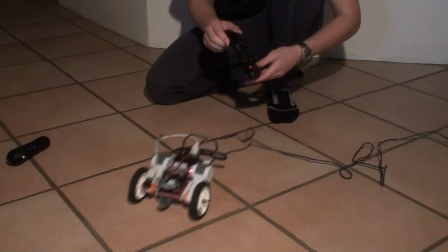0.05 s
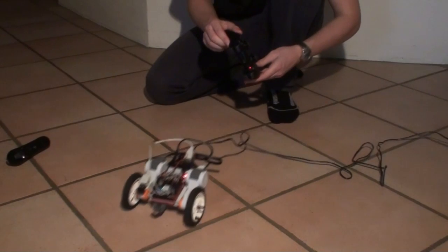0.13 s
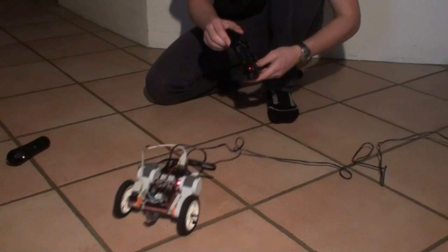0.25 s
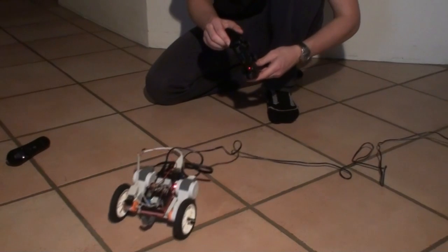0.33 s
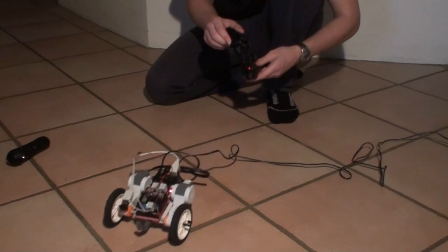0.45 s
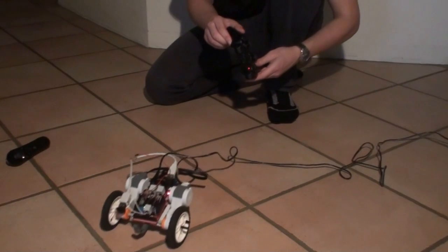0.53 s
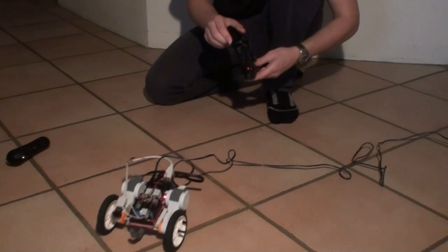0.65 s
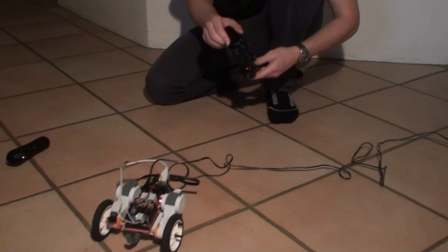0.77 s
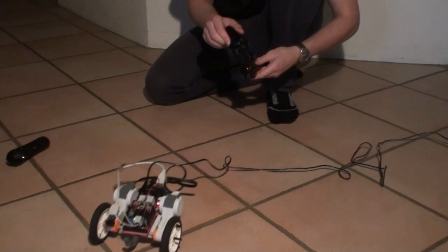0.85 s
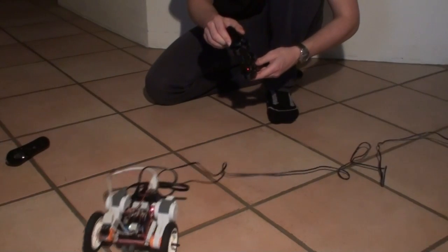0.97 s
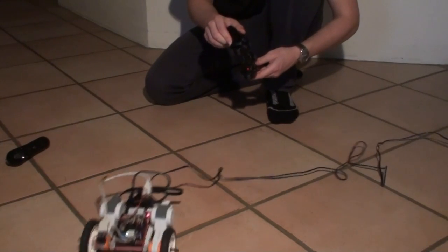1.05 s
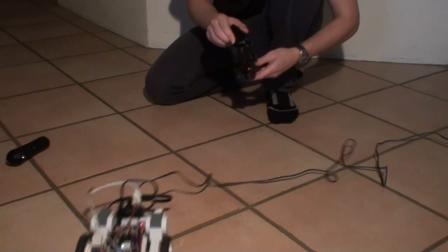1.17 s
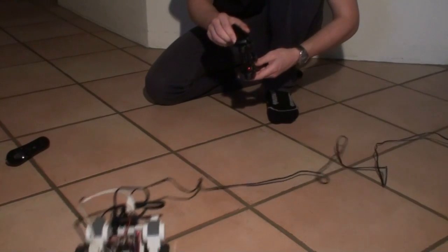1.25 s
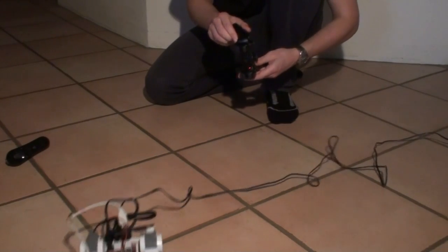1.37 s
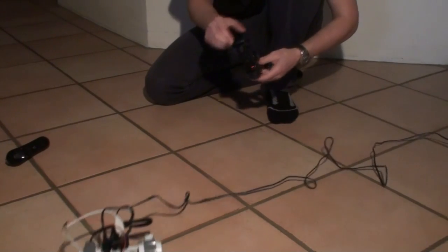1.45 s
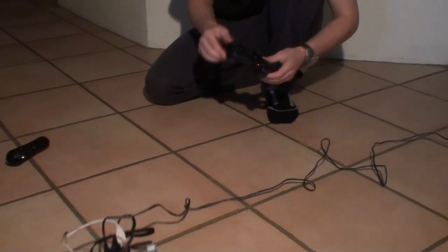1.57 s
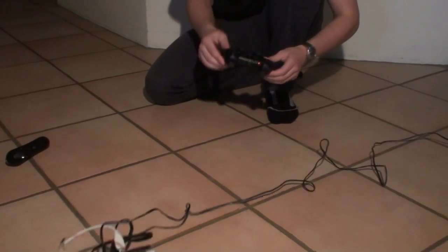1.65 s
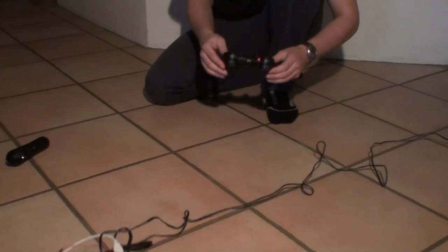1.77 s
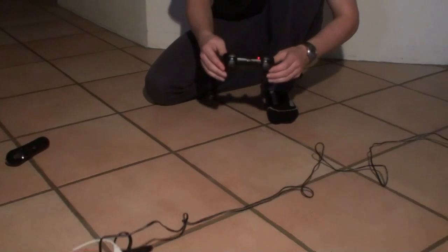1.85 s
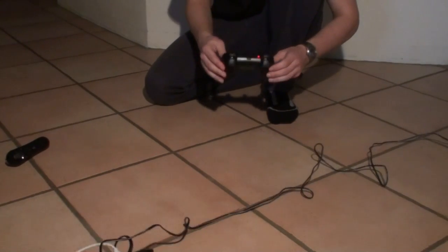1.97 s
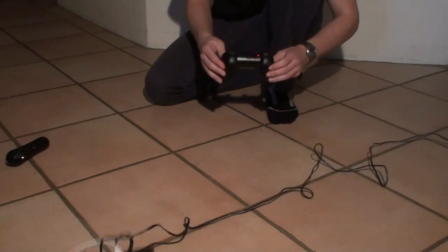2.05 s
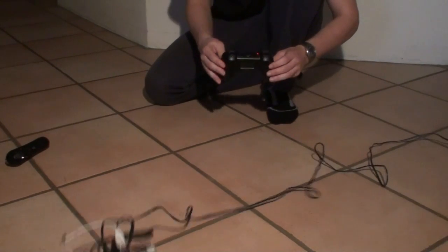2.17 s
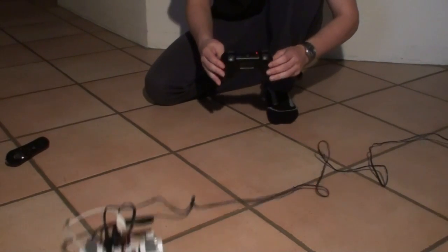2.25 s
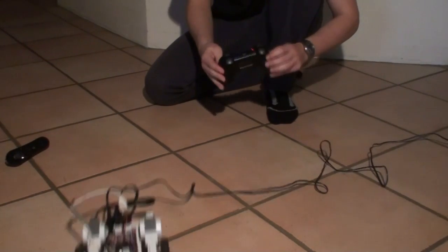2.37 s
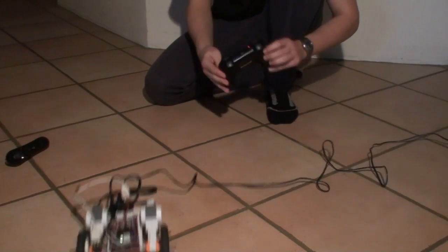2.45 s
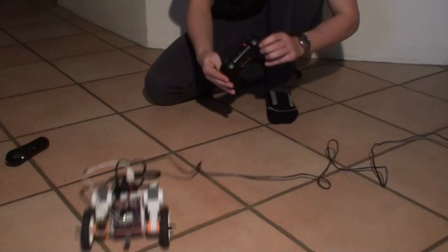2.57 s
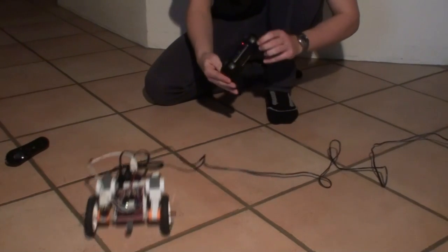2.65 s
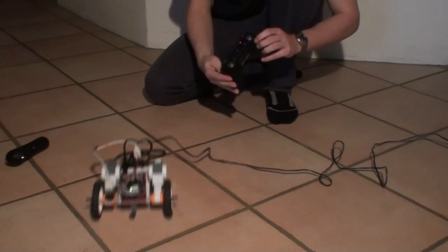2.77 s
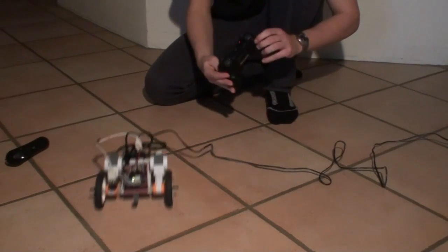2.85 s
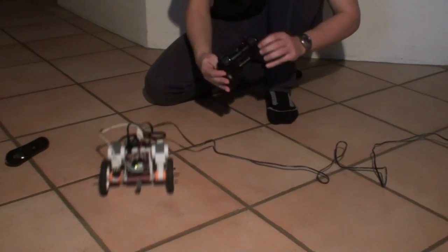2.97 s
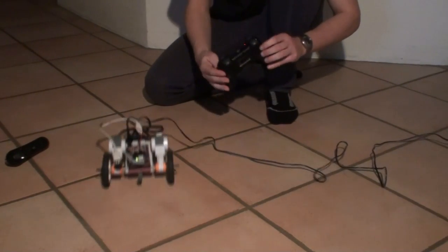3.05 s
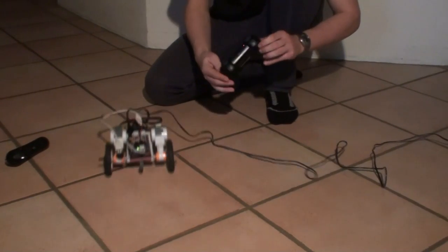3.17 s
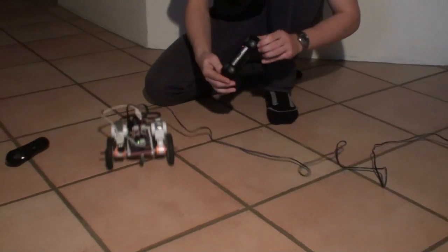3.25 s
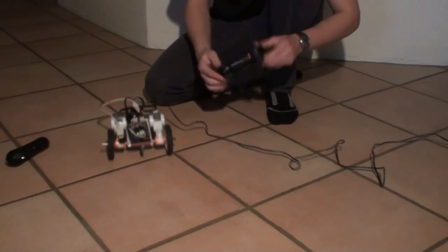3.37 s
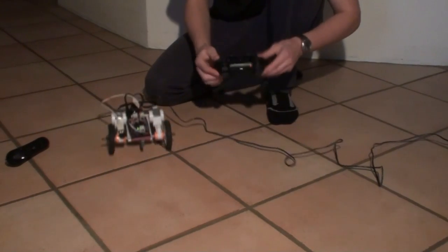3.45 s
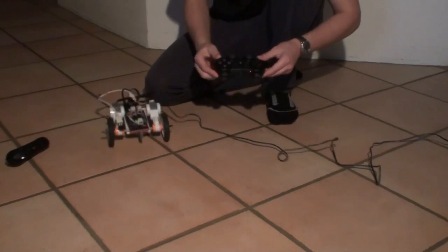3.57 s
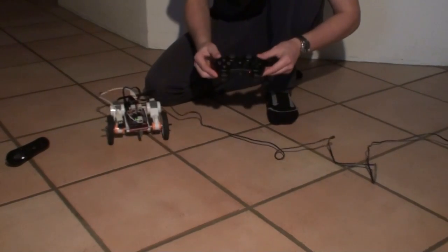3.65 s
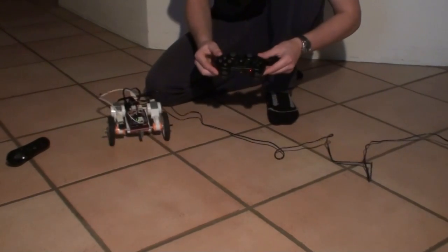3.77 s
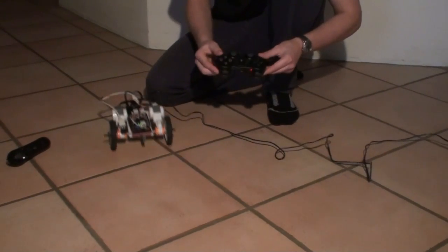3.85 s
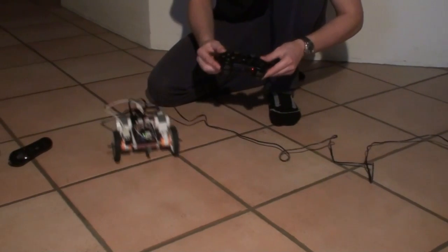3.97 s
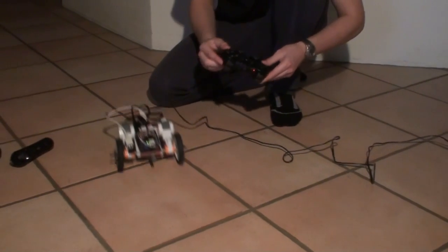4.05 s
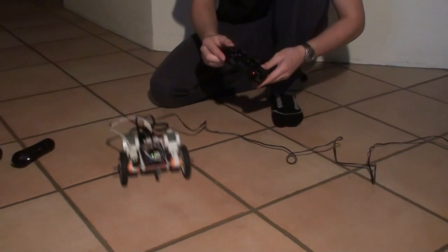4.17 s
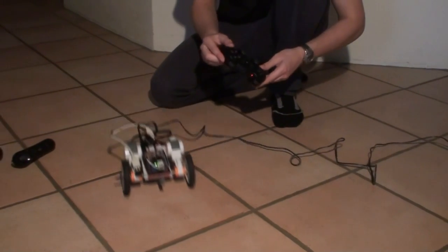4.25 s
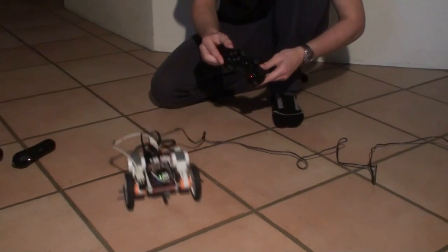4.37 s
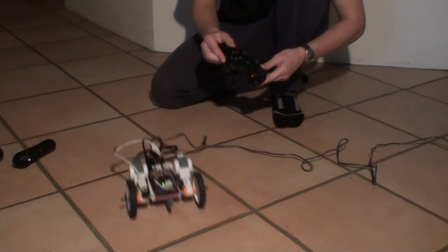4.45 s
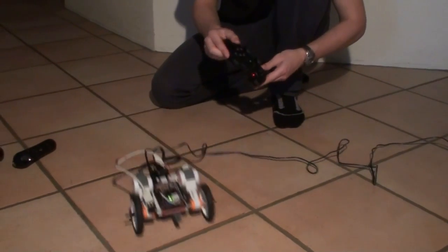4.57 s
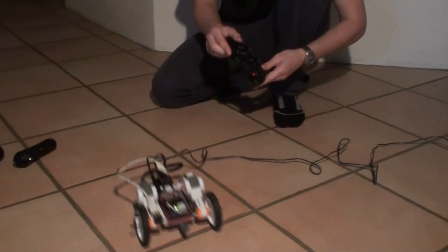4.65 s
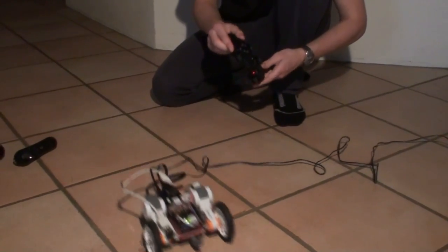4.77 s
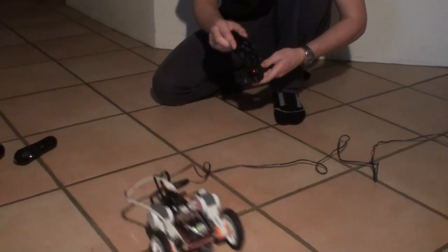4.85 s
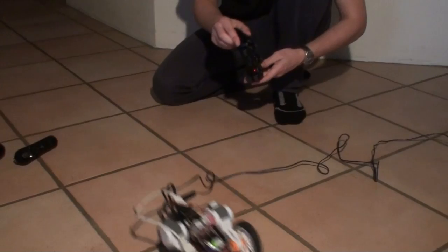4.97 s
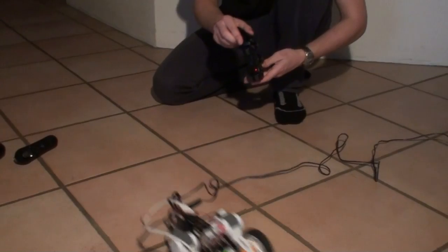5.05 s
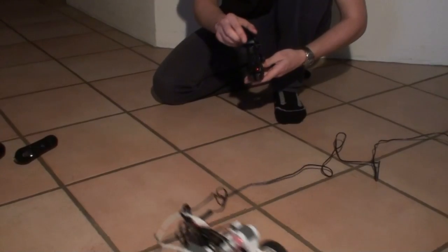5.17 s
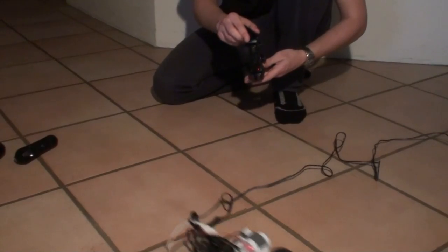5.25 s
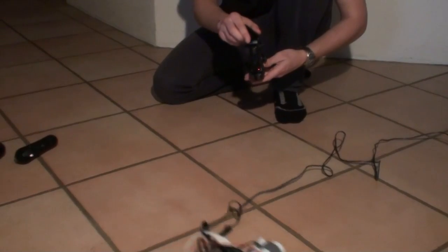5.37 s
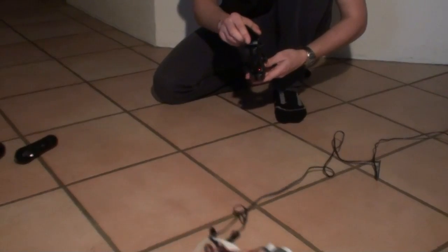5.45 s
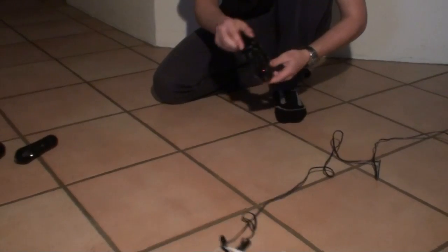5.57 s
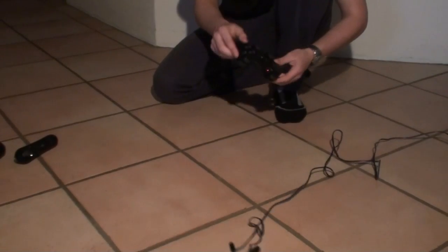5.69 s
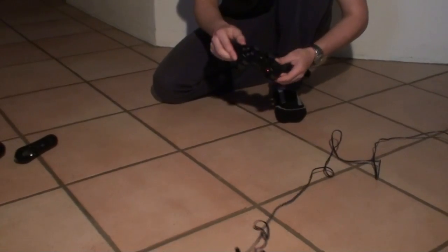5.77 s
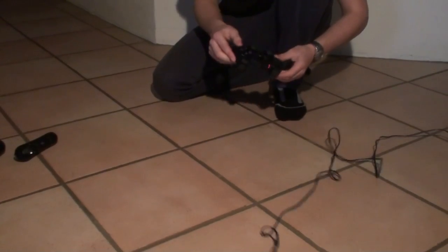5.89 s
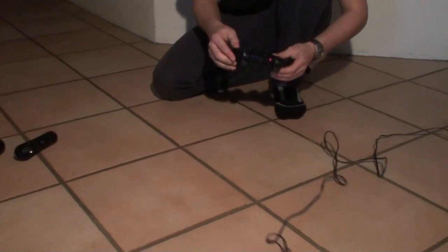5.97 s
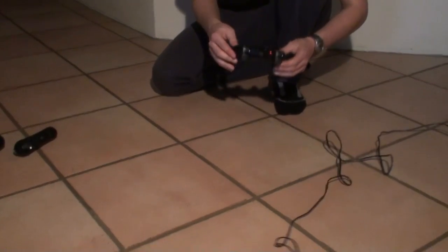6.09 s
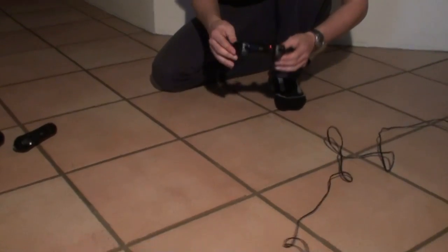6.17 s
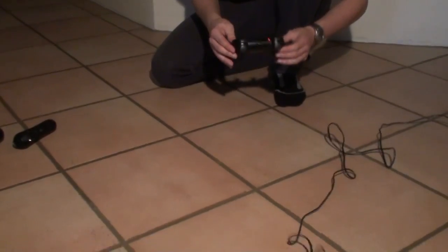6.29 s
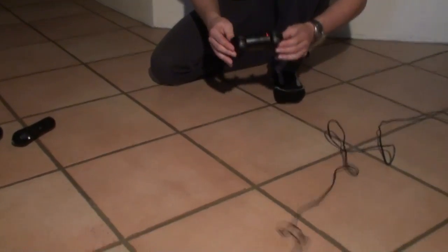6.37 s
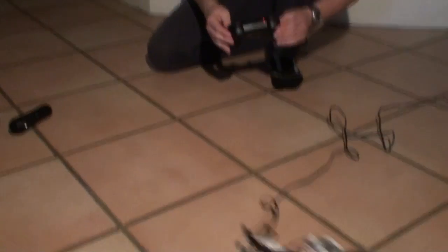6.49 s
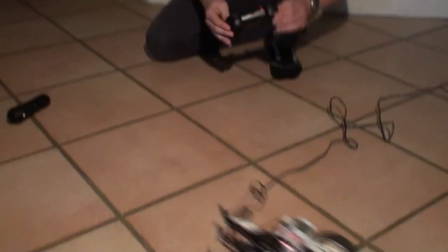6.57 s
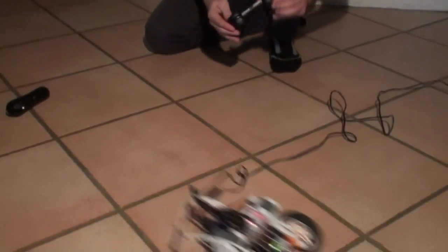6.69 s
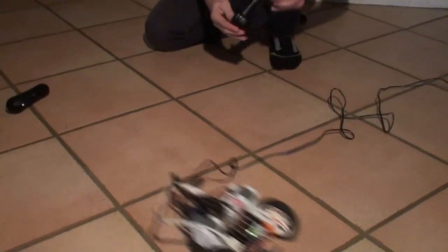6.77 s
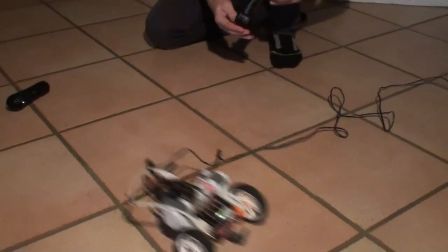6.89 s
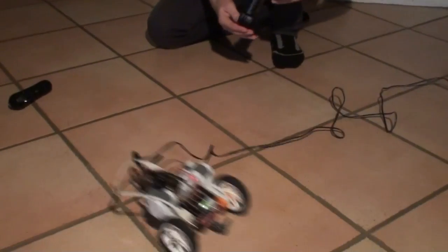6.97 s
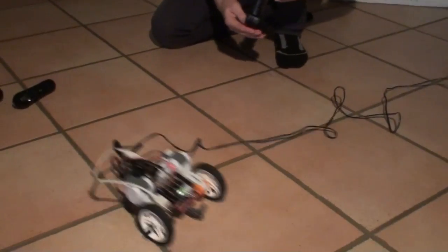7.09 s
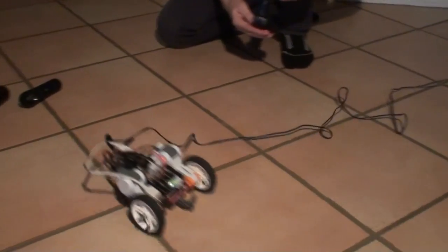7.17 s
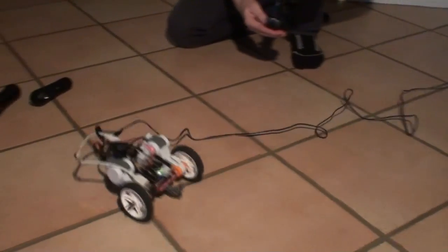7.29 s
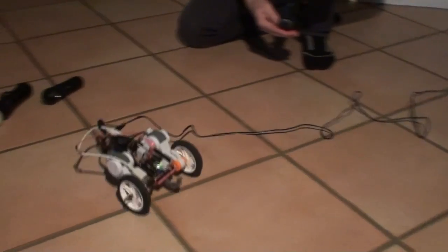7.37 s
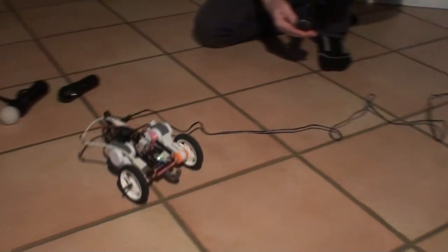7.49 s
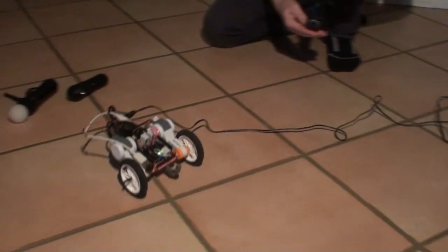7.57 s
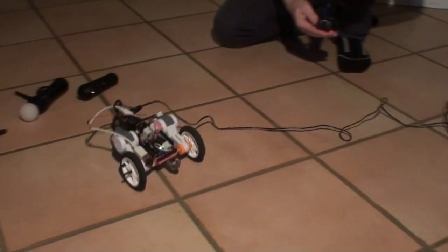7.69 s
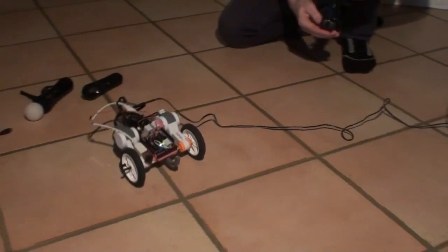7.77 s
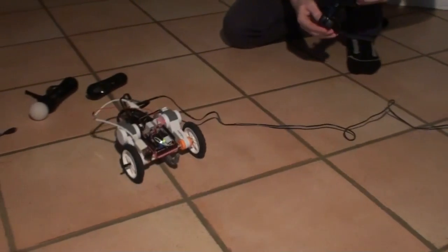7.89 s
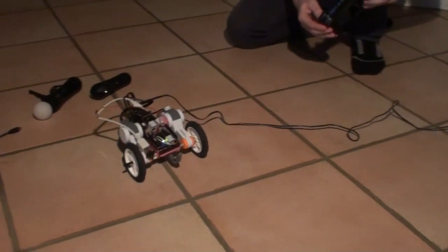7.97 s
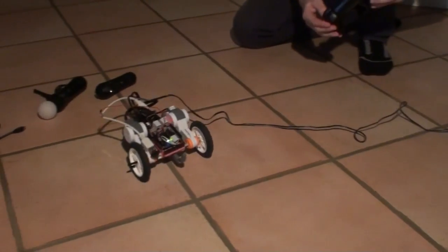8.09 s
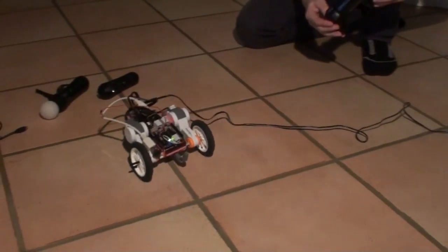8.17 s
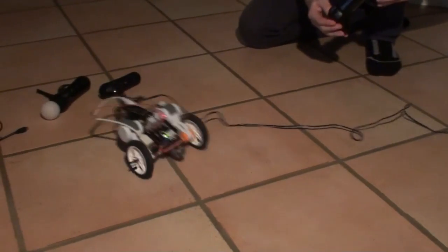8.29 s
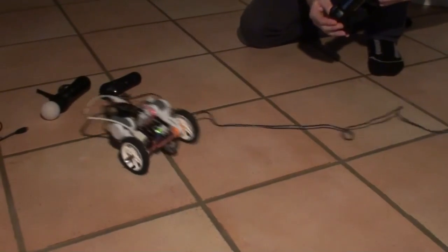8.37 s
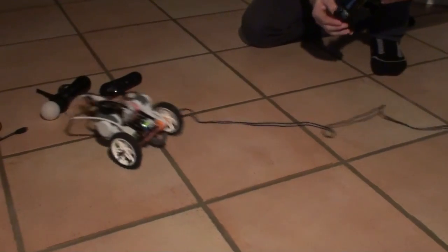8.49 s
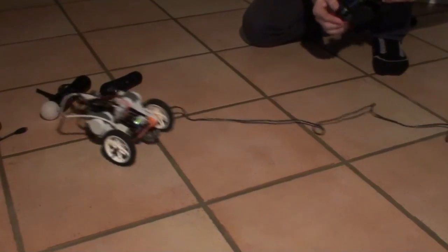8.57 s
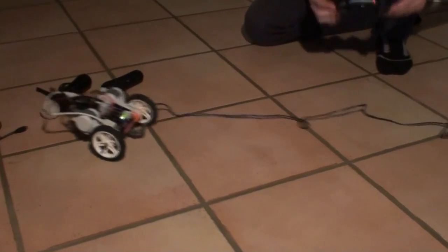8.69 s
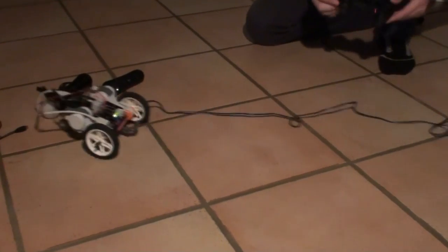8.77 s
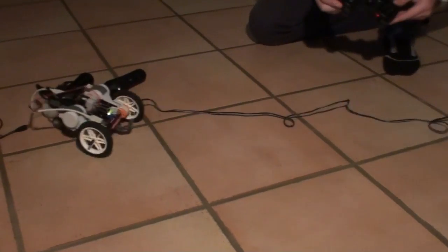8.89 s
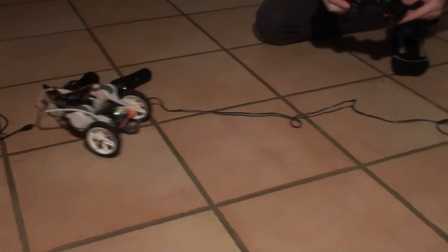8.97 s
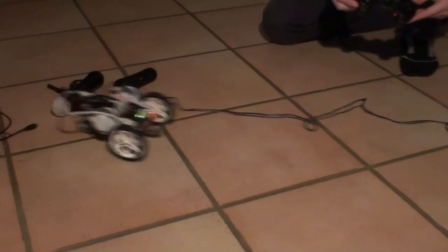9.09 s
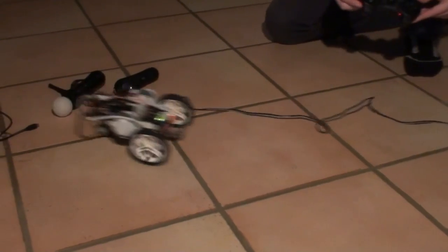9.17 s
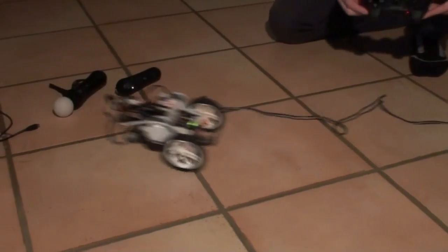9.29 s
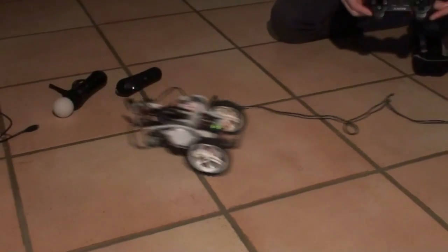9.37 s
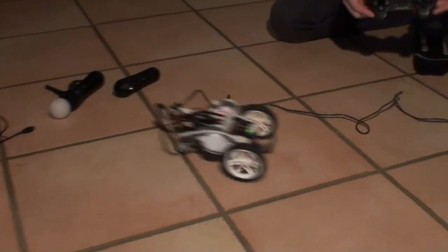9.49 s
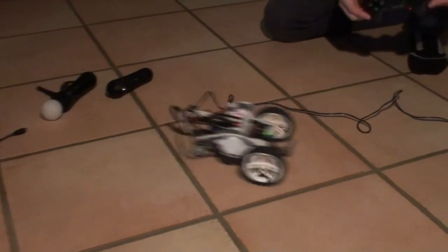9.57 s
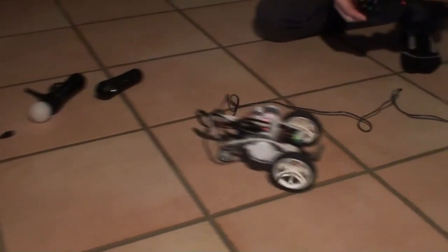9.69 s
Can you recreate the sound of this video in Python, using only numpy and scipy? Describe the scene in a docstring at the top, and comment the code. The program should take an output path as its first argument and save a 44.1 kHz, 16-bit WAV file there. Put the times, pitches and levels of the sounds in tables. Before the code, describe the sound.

A small two-motor toy robot whirs and rattles in bursts over a tiled floor, gear tones gliding up and down in a hard room.

```python
"""Gliding, singing tones over a plastic rattle, with dull knocks, brief squeals, a thin steady whistle and hiss:
a small two-motor robot drives back and forth over a tiled floor on a cable, in a hard room, near a microphone.
Gear teeth mesh in multiples of their contact rate; noise pulsed by the same contacts rings the robot's parts.
The motor driver gives the whistle, damped swings the knocks, decaying noise tails the room's answer."""
import sys
import numpy as np
from scipy import signal
from scipy.fft import rfft, irfft, next_fast_len
from scipy.io import wavfile
from scipy.ndimage import uniform_filter1d, map_coordinates

SR = 44100
rng = np.random.default_rng(int(sys.argv[2]) if len(sys.argv) > 2 else 0)


def inscribe(sig):
    """Save sig as 16-bit PCM at rate SR to the path in sys.argv[1].

    A 1-D sig is mono; a 2-D sig holds one channel per row.
    Samples are clipped to [-1, 1] before scaling.
    """
    pcm = np.round(np.clip(np.atleast_2d(sig).T, -1, 1) * 32767)
    wavfile.write(sys.argv[1], SR, pcm.astype(np.int16))


def linear_from_db(decibels):
    """Turn decibels (scalar or array-like) into linear amplitude factors; 0 gives 1."""
    return 10 ** (np.asarray(decibels, float) / 20)


N = 429534  # length in samples


def unit(x):
    """Normalisation: scales a signal to rms 1."""
    return x / np.sqrt(np.mean(x ** 2) + 1e-20)


def along(points, hz):
    """Interpolation of (Hz, value) points on a logarithmic frequency axis."""
    point_hz, value = np.transpose(points)
    return np.interp(np.log(hz + 1), np.log(point_hz + 1), value)


def curves(rows):
    """Linear interpolation in time: one value per sample for each column after the time."""
    seconds, *columns = np.transpose(rows)
    return [np.interp(np.arange(N) / SR, seconds, column) for column in columns]


def wobble(rate):
    """Band-limited fluctuation: a smooth random curve with rate knots a second."""
    knots = rng.standard_normal(int(N * rate / SR) + 4)
    return map_coordinates(knots, [np.arange(N) * rate / SR])


def filtered(x, response):
    """Linear filtering: the spectrum of x times a response given as a function of frequency."""
    size = next_fast_len(N + SR // 2)
    spectrum = rfft(x, size) * response(np.fft.rfftfreq(size, 1 / SR))
    return irfft(spectrum, size)[..., :N]


def body(modes, steep):
    """Modal superposition: resonances summed with alternating sign; steep sharpens their skirts."""
    def response(f):
        total = 0
        for k, (centre, width, db) in enumerate(modes):
            resonance = 1j * f * width / (centre ** 2 - f ** 2 + 1j * f * width)
            total = total + (-1) ** k * linear_from_db(db) * resonance ** steep
        return total
    return response


# Pushes of the motors, one short curve each. Each row: time in seconds, rattle level in dB before the parts' shares.
PUSHES = [
    [(0.0, -32), (0.32, -34), (0.68, -44)],
    [(0.76, -36.5), (0.86, -40.5)],
    [(0.93, -34.5), (1.03, -31), (1.41, -26), (1.95, -40)],
    [(2.16, -31), (2.28, -25)],
    [(2.36, -27.5), (2.41, -26), (3.63, -28.5)],
    [(3.88, -27), (4.45, -32), (5.05, -27.5), (5.83, -35.5)],
    [(5.875, -30), (5.92, -28.5), (6.05, -24.5), (6.21, -30)],
    [(6.375, -34), (6.43, -22.5), (6.48, -23)],
    [(6.59, -23), (6.64, -23)],
    [(6.75, -24), (7.05, -27), (7.19, -24), (7.92, -37)],
    [(8.29, -39), (8.35, -28.5), (8.71, -27), (8.93, -32)],
    [(9.09, -32.5), (9.14, -28.5), (9.74, -27.5)],
]


def drive_db():
    """Masking by the strongest: the loudest push sets the level, each rising and dying at common rates."""
    t = np.arange(N) / SR
    rise_db_per_s, fall_db_per_s = 260, 148
    levels = []
    for push in PUSHES:
        before = np.clip(push[0][0] - t, 0, None)
        after = np.clip(t - push[-1][0], 0, None)
        levels.append(curves(push)[0] - rise_db_per_s * before - fall_db_per_s * after)
    return np.max(levels, axis=0)


# Speed of the leading motor, one curve per burst of tones. Each row: time in seconds, tooth rate in Hz.
TOOTH_RATES = [
    [(0.92, 477), (1.0, 694), (1.06, 699), (1.12, 863), (1.18, 922), (1.4, 926), (1.53, 689), (1.6, 647)],
    [(2.14, 562), (2.17, 598), (2.24, 863), (2.28, 910), (2.33, 934)],
    [(2.38, 1041), (2.75, 1061), (2.9, 1028), (3.3, 1021), (3.45, 1008), (3.78, 973)],
    [(3.86, 670), (4.0, 970), (4.06, 980)],
    [(4.5, 902), (4.65, 1019), (4.75, 1050), (4.9, 1021), (5.08, 1016), (5.2, 954), (5.3, 794), (5.5, 589),
     (5.57, 580)],
    [(5.62, 838), (5.7, 718), (5.83, 628)],
    [(5.85, 602), (5.9, 799), (5.95, 915), (6.0, 957), (6.08, 913), (6.24, 611)],
    [(6.37, 479.6), (6.42, 689), (6.46, 855), (6.5, 895)],
    [(6.56, 1023), (6.7, 1067), (6.85, 1068), (7.15, 1029), (7.3, 1041), (7.38, 959), (7.44, 827),
     (7.5, 772)],
    [(8.33, 661), (8.37, 772.6), (8.42, 906), (8.5, 955.5), (8.67, 1009), (8.77, 957), (8.83, 900),
     (8.9, 723)],
    [(9.08, 505), (9.14, 717), (9.22, 825)],
]


def teeth(speed, jitter):
    """Frequency modulation: the phase of the tooth contacts wavers with the load, more while speed changes."""
    tooth_hz = curves(np.vstack(TOOTH_RATES))[0] * speed
    change_hz_per_s = np.abs(np.gradient(tooth_hz)) * SR
    strain = 1 + np.clip(change_hz_per_s / 4000, 0, 5)  # a change of 4000 Hz per second doubles the wavering
    wavering_hz = tooth_hz * (1 + jitter * strain * wobble(60))
    return tooth_hz, 2 * np.pi * np.cumsum(wavering_hz) / SR


# Strength of the tones, one row per burst. Each row: 2nd, 3rd and 4th multiple in dB against the rattle drive
# before housing and effort, gain of the slower motor's tones in dB.
BURST_LEVELS = [(-12, -12, -14, -16), (-11, -8, -12, -6), (-17, -10, -12, -5), (-18, -19, -20, -8),
                (-14, -13, -8, -3), (-11, -24, -16, -12), (-13, -7, -10, -12), (-18, -13, -18, -4),
                (-14.5, -9, -17, -9), (-14, -8.5, -11, -12), (-22, -25, -25, -6)]


def voicing():
    """Piecewise control: each burst's levels hold from its start to its end and glide between bursts."""
    rows = []
    for burst, levels in zip(TOOTH_RATES, BURST_LEVELS):
        rows += [(burst[0][0], *levels), (burst[-1][0], *levels)]
    return curves(rows)


# How the housing passes a tone. Each row: frequency in Hz, gain in dB.
HOUSING_GAIN = [(900, -20), (1400, -4), (1750, -2), (2080, -1), (2250, -9), (2520, -9), (2750, 0),
                (3050, 1), (3400, -7), (3750, -1), (4100, 0), (4400, -3)]
# Gain in dB of the 2nd, 3rd and 4th multiple at full effort: gained while speeding up, lost while slowing down.
EFFORT_GAIN = [2, 2.5, 4]


def mesh(tooth_hz, phase, beat, db):
    """Harmonic synthesis: multiples of the tooth rate flutter and beat once per turn of an off-centre wheel."""
    t = np.arange(N) / SR
    inside = sum((t > burst[0][0]) & (t < burst[-1][0]) for burst in TOOTH_RATES)
    running = uniform_filter1d(inside * 1., 900)
    change_hz_per_s = np.gradient(tooth_hz) * SR
    effort = uniform_filter1d(np.clip(change_hz_per_s / 1200, -1, 1), 900)
    second_db, third_db, fourth_db = [
        db + level + gain * effort + along(HOUSING_GAIN, k * tooth_hz)
        for k, level, gain in zip(range(2, 5), voicing(), EFFORT_GAIN)]
    # under the load of speeding up, the 5th and 6th multiples sing as they sweep the housing's main resonance
    load = uniform_filter1d(np.clip(change_hz_per_s / 1500, .03, 1), 900)

    def passing_db(k):
        detuning = (k * tooth_hz - 2900) / 300
        return db - 19 - 10 * np.log10((1 + detuning ** 2) / load ** 2)

    levels_db = [second_db - 14, second_db, third_db, fourth_db, passing_db(5), passing_db(6)]
    turn = phase / 31  # 31 tooth contacts a turn
    tones = np.zeros(N)
    for k, level_db in enumerate(levels_db, 1):
        unsteady_db = 3 * wobble(40) + 1.5 * wobble(7)  # quick flutter and slow drift
        once_per_turn = 1 + beat * np.cos(turn + k)
        tones += linear_from_db(level_db + unsteady_db) * once_per_turn * np.sin(k * phase)
    return running * tones


# Resonances of six parts of the robot.
# Each row: centre in Hz, width in Hz before sharpening, relative level in dB.
GEARBOX_MODES = [(2880, 550, -1), (3600, 700, -3), (4120, 550, 0), (4850, 800, -4)]
CHASSIS_MODES = [(840, 880, -8.5), (1253, 1070, -5.5), (2100, 2450, -2)]
COVER_MODES = [(5320, 1400, -1.8), (6555, 1470, 1)]
AIR_MODES = [(11570, 1650, 0)]
PINION_MODES = [(9680, 560, 6.5), (10456, 1020, 13), (11480, 1700, -1)]
SHELL_MODES = [(7710, 2170, 4.5), (9400, 1960, -3)]
# Shares of gearbox, chassis, cover and top air, before a common trim.
# Each row: share in dB at cruising level, dB gained forward, dB per dB of rattle above cruising.
PART_SHARES = [(-4, -0.5, 0), (-13, 4.5, -0.48), (-8.5, 7.5, 0), (-21, 10, 0.33)]
# The drive's course. Each row: time in seconds, direction from about 0 backward to about 1 forward,
# shares of the pinion's ring and of the shell's ring in dB against the rattle drive before the same trim.
DRIVE_COURSE = [(0, 1.1, -8.5, -3.5), (.7, 0.46, -12.5, -6.5), (.9, 0.18, -19, -10), (.97, 0.82, -12, -0.5),
                (1.45, .4, -12, -5.5), (1.95, 0.84, -9.5, -4.5), (2.15, 0.42, -6.5, -6.5),
                (3.62, 0.21, -4, -5), (3.8, 0.3, -23, -7), (3.9, 0.69, -16, -7.5), (4.15, 1, -7, -4.5),
                (4.5, 0.91, -8.5, -3.5), (5.1, 0.78, -3.5, -3), (5.4, .7, -6.5, -8), (5.9, 0.94, -7, -4.5),
                (6.15, 0.53, -6, -5.5), (6.35, 0.031, -10.5, -9.5), (6.6, 0.55, -3.5, -4.5),
                (7.5, 0.1, -2, -7), (7.9, 0, -12.5, -9.5), (8.2, 0.21, -5.5, -6), (8.4, 0.1, -1, -6),
                (8.85, 0.21, -0.5, -5), (9.02, 0.05, -19, -15), (9.12, 0.7, -8, -5.5), (9.74, 1.23, -9, -4)]


def rattle(phases, db):
    """Source and filter: loose teeth chatter as noise pulsed by both motors' contacts, ringing six parts."""
    cruise_db, trim_db = -27, -1.5
    forward, *ring_shares = curves(DRIVE_COURSE)
    shares_db = [base + gain * forward + slope * (db - cruise_db) for base, gain, slope in PART_SHARES]
    shares_db += ring_shares
    slack_db = 1.0 * wobble(35) + 0.33 * wobble(150)  # uneven teeth, felt by all parts alike
    gates = [linear_from_db(2.9 * np.cos(phase)) for phase in phases]
    parts = [GEARBOX_MODES, CHASSIS_MODES, COVER_MODES, AIR_MODES, PINION_MODES, SHELL_MODES]
    out = np.zeros(N)
    for modes, share_db in zip(parts, shares_db):
        chatter = sum(gate * rng.standard_normal(N) for gate in gates)
        ringing = unit(filtered(chatter, body(modes, steep=2.14)))
        out += linear_from_db(db + share_db + trim_db + slack_db + 0.42 * wobble(12)) * ringing
    return out


# Brief narrow squeals of the gears. Each row: start in seconds, length in seconds, frequency in Hz,
# level in dB before the roughness, scale of the pitch wander in Hz.
GEAR_SQUEALS = [(1.203, 0.13, 4950, -40, 16), (1.449, 0.11, 2930, -33, 24),
                (1.709, 0.09, 1510, -37.5, 31.5), (1.638, 0.075, 2720, -35.5, 19),
                (2.138, 0.14, 2840, -25.5, 154), (4.847, 0.22, 5560, -43, 18.8),
                (4.93, 0.2, 2040, -34, 10.8), (7.13, .1, 4250, -33, 60), (7.131, 0.089, 5150, -24, 17),
                (7.467, 0.21, 2918, -32, 49), (7.75, 0.27, 4210, -44, 120), (8.257, 0.17, 2920, -33.5, 103)]


def squeals():
    """Narrow-band tones: each swells and fades, unsteady in level and wandering in pitch by its spread."""
    t = np.arange(N) / SR
    rough = linear_from_db(2.1 * wobble(90))
    wander = np.cumsum(wobble(120)) / SR
    out = np.zeros(N)
    for start, length, hz, db, spread in GEAR_SQUEALS:
        arch = np.sin(np.pi * np.clip((t - start) / length, 0, 1))
        swell = np.sqrt(np.clip(arch, 0, 1))
        out += linear_from_db(db) * swell * np.sin(2 * np.pi * (hz * t + spread * wander))
    return rough * out


# Knocks of the chassis. Each row: start in seconds, swing level in dB before onset and decay,
# swing frequency in Hz, low push level in dB before decay.
CHASSIS_KNOCKS = [(6.591, -35, 700, -35), (9.624, -31, 1380, -44)]


def bumps():
    """Damped oscillation: a softly starting swing dies away over one low push."""
    out, t = np.zeros(N + SR), np.arange(SR // 8) / SR
    for start, db, hz, push_db in CHASSIS_KNOCKS:
        push = linear_from_db(push_db) * np.sin(2 * np.pi * 230 * t) * np.exp(-t / .003)
        onset = 1 - np.exp(-t / .002)
        swing = linear_from_db(db - 60 * t / .05) * onset * np.sin(2 * np.pi * hz * t)  # falls 60 dB in 0.05 s
        out[round(start * SR):][:len(t)] += swing + push
    return out[:N]


# Switching of the motor driver. Each row: frequency in Hz, level in dB before a lift of 3 dB and the wavering.
DRIVER_TONES = [(9991, -61)]


def whistle():
    """Amplitude modulation: the driver's thin steady tone wavers a little in level."""
    t = np.arange(N) / SR
    return sum(linear_from_db(db + 3.0 + 1.2 * wobble(15)) * np.sin(2 * np.pi * hz * t) for hz, db in DRIVER_TONES)


# Faint low hum in the room. Each row: frequency in Hz, level in dB before the wavering.
HUM_TONES = [(68, -72.5), (216, -73)]


def hum():
    """Amplitude and phase modulation: low steady tones waver slightly in level and phase."""
    t = np.arange(N) / SR
    out = np.zeros(N)
    for hz, db in HUM_TONES:
        level = linear_from_db(db + 1.8 * wobble(2.9))
        out += level * np.sin(2 * np.pi * hz * t + 1.44 * wobble(11))
    return out


# Straight path against the room. Each row: frequency in Hz, gain in dB.
DIRECT_GAIN = [(600, -7.5), (2000, 0), (6000, -2), (14000, -2)]


def direct_path(x):
    """Direct sound: the straight path colours the source by frequency."""
    return filtered(x, lambda hz: linear_from_db(along(DIRECT_GAIN, hz)))


# Reverberation time of the room. Each row: frequency in Hz, time to fall 60 dB in seconds.
DECAY_TIMES = [(500, 0.5), (3000, 0.61), (12000, 0.52)]


def room(x):
    """Reverberation: noise tails decay by frequency, differ between channels and change as the robot moves."""
    hop = SR // 4  # a new pair of tails every quarter second
    starts = np.arange(0, N + hop, hop)
    noise = rng.standard_normal((len(starts), 2, SR // 3))
    hz, t, spectra = signal.stft(noise, SR, nperseg=256)
    decay = linear_from_db(-60 * t / along(DECAY_TIMES, hz)[:, None])
    tails = signal.istft(spectra * decay, SR, nperseg=256)[1]
    padded = np.pad(x, (hop + 200, 2 * hop))  # 200 samples of delay before the answer
    out = np.zeros((2, N + 2 * SR))
    for start, tail in zip(starts, tails):
        piece = padded[start:start + 2 * hop] * np.hanning(2 * hop)
        wet = signal.fftconvolve(piece[None], tail / np.linalg.norm(tail[0]), axes=1)
        out[:, start:start + wet.shape[1]] += wet
    return out[:, hop:hop + N]


def leaned(pair, lean):
    """Interchannel level difference: left and right part by a lean that depends on frequency."""
    return filtered(pair, lambda hz: linear_from_db(along(lean, hz) * np.array([[.5], [-.5]])))


# Spectrum of room air and microphone hiss. Each row: frequency in Hz, relative density in dB per Hz.
HISS_SPECTRUM = [(15, -36), (25, -16.5), (266, -3), (530, -3), (585, -4.5), (630, -4.5), (748, -1.5),
                 (934, -4), (9000, -19.5), (11700, -61), (19800, -120)]
# Lean of the hiss. Each row: frequency in Hz, left over right in dB.
HISS_BALANCE = [(60, -16), (240, 0), (950, 6), (3770, 11), (15000, -15)]


def hiss():
    """Partial coherence: steady shaped noise, only partly shared by the channels."""
    white = rng.standard_normal((2, N)) + 0.67 * rng.standard_normal(N)
    noise = filtered(white, lambda hz: linear_from_db(along(HISS_SPECTRUM, hz)))
    return linear_from_db(-52.5) * unit(leaned(noise, HISS_BALANCE))


# Lean of the robot and its room answer. Each row: frequency in Hz, left over right in dB.
ROBOT_BALANCE = [(700, -7.5), (2400, -3), (6000, -6.5), (10500, -2), (12500, -14.5), (15000, -76)]


def scene():
    """Superposition: two motors, the second a tenth slower; tones beam more directly than the rattle."""
    db = drive_db()
    lead_hz, lead_phase = teeth(speed=1, jitter=0.00393)
    lag_hz, lag_phase = teeth(speed=.9, jitter=0.00424)
    lead_tones = linear_from_db(3) * mesh(lead_hz, lead_phase, beat=0.34, db=db)
    lag_tones = linear_from_db(voicing()[-1]) * mesh(lag_hz, lag_phase, beat=0.27, db=db)
    tones = lead_tones + lag_tones + squeals()
    noisy = rattle([lead_phase, lag_phase], db)
    direct = direct_path(tones + noisy) + whistle() + hum() + bumps()
    answer = room(linear_from_db(-1.5) * noisy + linear_from_db(-4.5) * tones)
    return leaned(direct + answer, ROBOT_BALANCE) + hiss()


# The microphone fades at the top. Each row: frequency in Hz, gain in dB.
TOP_FADE = [(12500, 0), (13800, -5), (14900, -17), (15200, -23)]


def band_limited(x):
    """Low-pass filtering: the microphone's fade at the top, then nothing from 15450 Hz up."""
    return filtered(x, lambda hz: linear_from_db(along(TOP_FADE, hz)) * (hz < 15450))


def band_limit(x):
    """A steep low-pass at the top of the band."""
    return signal.sosfilt(signal.butter(12, 16090, fs=SR, output="sos"), x)


def record(dry):
    """Signal chain: the mix passes the microphone's band limit first."""
    finished = band_limited(dry)
    return band_limit(finished)


dry = scene()
out = record(dry)
inscribe(out)
```